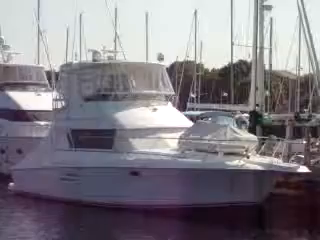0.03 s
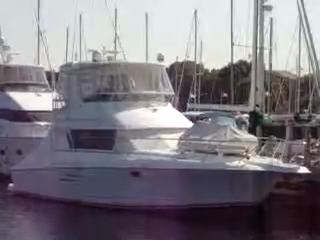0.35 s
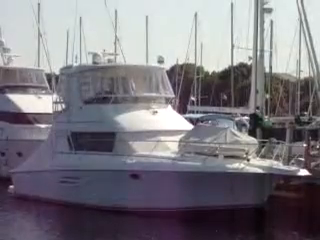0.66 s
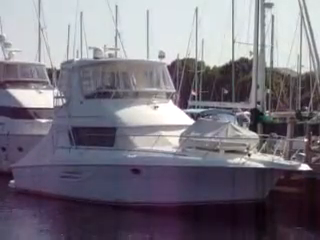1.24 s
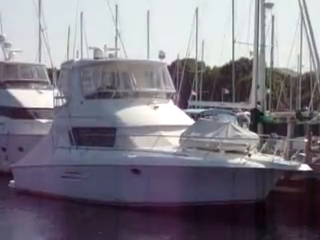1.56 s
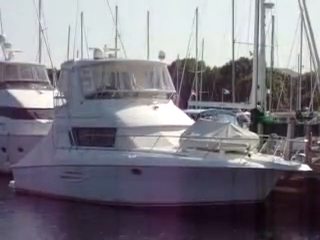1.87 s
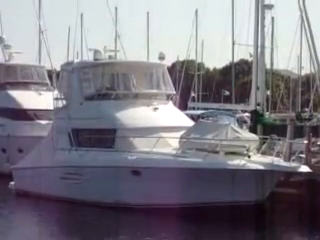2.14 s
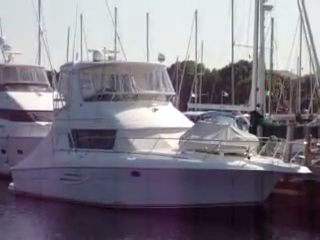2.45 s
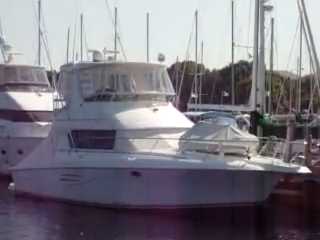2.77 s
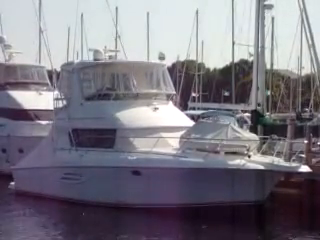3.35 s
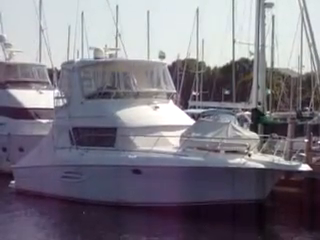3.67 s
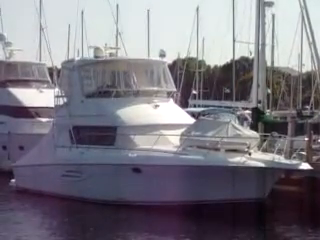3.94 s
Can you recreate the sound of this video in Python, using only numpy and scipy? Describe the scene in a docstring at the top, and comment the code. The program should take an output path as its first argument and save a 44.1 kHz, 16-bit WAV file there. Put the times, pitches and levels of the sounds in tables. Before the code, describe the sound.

Wind and distant engines rumble steadily at a marina, with a hum and a thin high electronic whine. Early on, a few sharp knocks, snaps and a metal clink sound close to the microphone, then only faint taps and chirps.

```python
"""A marina, on one camera microphone. The camera fades in on a steady low rumble of wind and distant
engines with one hum in it, and adds its own hiss and a thin whine that ticks once a picture.
Faint taps start around the moorings. Close by, a hard body knocks and snaps and a small metal fitting
clinks, all in the first second or so. Wind puffs on the microphone now and then, the taps go on,
and from three seconds in a far bird chirps twice."""
import sys
import numpy as np
from scipy.fft import rfft, irfft, next_fast_len
from scipy.io import wavfile
from scipy.ndimage import map_coordinates

SR = 44100
rng = np.random.default_rng(int(sys.argv[2]) if len(sys.argv) > 2 else 0)


def output_pcm(signal):
    """Save a mono or channel-first signal as 16-bit PCM at the path in sys.argv[1].

    Samples are clipped to [-1, 1] before scaling.
    """
    pcm = np.clip(np.atleast_2d(signal).T, -1, 1) * 32767
    wavfile.write(sys.argv[1], SR, np.round(pcm).astype(np.int16))


N = 176400
T = np.arange(N) / SR
RING_T = np.arange(SR // 4) / SR  # seconds since a contact


def amp(db):
    """Decibels to gain."""
    return 10 ** (np.asarray(db) / 20)


def unit(x):
    """Scale to rms 1."""
    return x / np.sqrt(np.mean(x ** 2) + 1e-20)


def curve(rows):
    """(time, value) points joined by lines."""
    return np.interp(T, *np.transpose(rows))


def wobble(rate):
    """A smooth random curve, rate knots a second."""
    return map_coordinates(rng.standard_normal(8192), [T * rate], mode="wrap")


def tone(pitch_hz):
    """A sine that follows a moving pitch."""
    return np.sin(2 * np.pi * np.cumsum(pitch_hz) / SR)


def filtered(x, response):
    """Filter x by a gain given as a function of frequency."""
    size = next_fast_len(N + 8192)
    return irfft(rfft(x, size) * response(np.fft.rfftfreq(size, 1 / SR)), size)[:N]


def noise(spectrum):
    """Noise of rms 1 shaped by (f/Hz, level/dB) points."""
    hz, db = np.transpose(spectrum)

    def response(f):
        return amp(np.interp(np.log(f + 1), np.log(hz), db, left=-120, right=-120))
    return unit(filtered(rng.standard_normal(N), response))


def band(hz, octaves):
    """Noise of rms 1 around one frequency."""
    white = rng.standard_normal(N)
    return unit(filtered(white, lambda f: np.exp(-(np.log2((f + 1) / hz) / octaves) ** 2)))


def add(track, s, sound):
    """Mix a sound in at s seconds."""
    part = track[round(s * SR):][:len(sound)]
    part += sound[:len(part)]


def ring(modes, scatter_db=1):
    """Damped modes of alternating sign, a little different at each blow."""
    out = np.zeros(len(RING_T))
    for k, (hz, db, t60) in enumerate(modes):
        decay = amp(db + scatter_db * rng.standard_normal() - 60 * RING_T / t60)
        out += (-1) ** k * decay * np.sin(2 * np.pi * hz * RING_T)
    return out


def blows(contacts, modes, crack_db, crack_t60_s):
    """Each contact gives a short crack and rings the modes."""
    out = np.zeros(N)
    for s, db in contacts:
        crack = amp(crack_db - 60 * RING_T / crack_t60_s) * rng.standard_normal(len(RING_T))
        add(out, s, amp(db) * (ring(modes) + crack))
    return out


def wind_and_engines(lumps_db=1.3, wash_db=-33, flutter_db=0.98):
    """Wind and engines across the marina: a lumpy low rumble under a smoother distant wash."""
    # swells of the rumble: t/s, level/dB
    rumble_level = [(0.3, -22), (0.5, -28), (0.63, -19), (0.8, -24.5), (1.08, -21), (1.3, -25), (1.56, -22),
                    (1.7, -23.5), (2.3, -23), (2.5, -24), (2.95, -22.5), (3.5, -24.5), (3.75, -22),
                    (4.0, -23.5)]
    # spectra of the rumble and the wash: f/Hz, relative density/dB
    rumble_spectrum = [(15, -31), (30, -10), (50, -4), (75, -0.5), (130, 2), (185, -.5), (260, -2.5),
                       (350, -7), (500, -12.5), (750, -17.5), (1200, -28), (2500, -70)]
    wash_spectrum = [(150, -6.5), (400, -2), (650, -3), (880, 1.5), (1050, -8.5), (1300, -14.5),
                     (1650, -16), (2000, -19), (2400, -25.5), (3200, -25), (4000, -36.5), (6000, -44)]
    rumble = unit(noise(rumble_spectrum) * amp(lumps_db * wobble(21.94)))
    wash = noise(wash_spectrum) * amp(wash_db + flutter_db * wobble(14))
    return rumble * amp(curve(rumble_level)) + wash


def engine_hum(hz=185.1, wander_hz=0.77, waver_db=1):
    """One wavering tone from a distant engine."""
    # course of the hum: t/s, level/dB
    hum_level = [(0.3, -27.5), (0.9, -29.5), (1.4, -31.5), (2.0, -29.5), (2.5, -26.5), (2.9, -24.5),
                 (3.4, -25.5), (4.0, -27)]
    hum = np.sqrt(2) * tone(hz + wander_hz * wobble(9))
    return hum * amp(curve(hum_level) + waver_db * wobble(10))


def camera_whine(picture_hz=28.94, first_tick_s=0.0075, tick_s=0.0017, swing_hz=4, jitter_hz=7):
    """The camera's electronics: two thin whines; each picture ticks and tugs the main whine's pitch."""
    # drift of the main whine: t/s, f/Hz
    drift = [(0, 7702), (1.36, 7703), (1.38, 7694), (2.3, 7696), (3.0, 7702), (4.0, 7697)]
    # spectrum of a tick: f/Hz, relative density/dB
    tick_spectrum = [(2500, -23), (5000, -10), (5800, 5), (7500, -7), (8300, -15), (11000, -31)]
    pictures = (T - first_tick_s) * picture_hz
    pitch = curve(drift) + swing_hz * np.cos(2 * np.pi * pictures) + jitter_hz * wobble(250)
    main_whine = amp(-39.5) * tone(pitch)
    upper_whine = amp(-51) * np.sin(2 * np.pi * 7864 * T)
    since_tick = (pictures % 1) / picture_hz
    ticks = amp(-48 + 2 * wobble(4.2)) * noise(tick_spectrum) * np.exp(-since_tick / tick_s)
    return np.sqrt(2) * (main_whine + upper_whine) + ticks


def mooring_taps(t60_s=0.026):
    """Faint dry taps around the moorings, each a dying burst of noise with its own colour."""
    # taps: t/s, level/dB, centre f/Hz
    taps = [(0.2602, -35, 2190), (0.457, -38, 1900), (0.461, -41, 4400), (0.7577, -39, 3250),
            (0.9303, -34.5, 2970), (1.4864, -39, 2800), (2.7162, -41, 2600), (3.02, -42, 2360),
            (3.8177, -42, 3280), (3.8581, -39, 2100)]
    return sum(band(hz, octaves=0.52) * (T >= s) * amp(db - 60 * np.abs(T - s) / t60_s)
               for s, db, hz in taps)


def knocks():
    """Dull knocks on a hard body close to the microphone."""
    # contacts: t/s, level/dB
    contacts = [(0.3537, -14), (0.3736, -33), (0.5722, -29.5), (0.6385, -28.5), (0.6440, -30),
                (1.1400, -25), (1.1452, -24)]
    # modes of the body: f/Hz, level/dB, t60/s
    body_modes = [(600, -12, 0.024), (970, 3.5, 0.015), (1340, 2.5, 0.0079), (1627, -1, 0.024),
                  (2040, -4, 0.034), (2420, -6.5, 0.024), (2930, -4.5, 0.0097), (3140, -8, 0.019),
                  (3900, -2, 0.012), (4730, -11.5, 0.017), (6100, -3.5, 0.0042), (7000, -17, .006)]
    return blows(contacts, body_modes, crack_db=-17.5, crack_t60_s=0.006)


def snaps():
    """Sharp snaps, just as close, ring the higher modes of the body's shell."""
    # contacts: t/s, level/dB
    contacts = [(0.5722, -34), (0.6002, -26), (1.1384, -19), (1.1399, -10), (1.1426, -15.5)]
    # modes of the shell: f/Hz, level/dB, t60/s
    shell_modes = [(1880, -19.5, 0.028), (2500, -11, 0.027), (3050, -2.5, 0.015), (3360, -7.5, 0.011),
                   (4300, -6.5, 0.0087), (4970, -1.5, 0.0087), (5760, -11, .012), (6300, -9.5, .01),
                   (7460, -7.5, 0.009), (8330, -11.5, 0.0093)]
    return blows(contacts, shell_modes, crack_db=-18.5, crack_t60_s=0.008)


def clinks(flat_fraction=0.12, settle_s=0.001):
    """Each touch of a small metal fitting nearby gives a short ping and a longer ring."""
    # touches: t/s, ring level/dB, ping f/Hz, ping level/dB, ping t60/s
    touches = [(0.5725, -38, 6170, -20.5, .013), (0.6004, -26, 3460, -22, 0.032),
               (0.6012, -44, 7000, -24, .028), (0.6368, -35, 4544, -21.5, 0.037)]
    # modes of the fitting: f/Hz, level/dB, t60/s
    fitting_modes = [(1440, -8.5, .09), (1770, -7, .025), (2020, 1.5, 0.14), (2320, -4.5, 0.2),
                     (4650, -6, .012), (5750, 2, 0.014), (8250, -9, .016), (9100, -12, 0.015)]
    out = np.zeros(N)
    for s, ring_db, hz, ping_db, t60 in touches:
        pitch = hz * (1 - flat_fraction * np.exp(-RING_T / settle_s))  # starts flat and settles
        ping = amp(ping_db - 60 * RING_T / t60) * tone(pitch)
        add(out, s, ping + amp(ring_db) * ring(fitting_modes))
    return out


def wind_puffs():
    """Brief low swells of wind right on the microphone."""
    # puffs: t/s, level/dB, centre f/Hz, half-length/s
    puffs = [(0.585, -20.5, 121, 0.013), (0.891, -17.5, 167, .012), (1.025, -26, 335, 0.013),
             (1.39, -18.5, 76, 0.022), (1.564, -20, 222, .02), (2.623, -17, 150, 0.013),
             (3.742, -28.5, 424, .04)]
    return sum(amp(db) * band(hz, octaves=0.81) * np.exp(-((T - s) / half_s) ** 2)
               for s, db, hz, half_s in puffs)


def bird_chirps(upturn_hz=200, blur_hz=85.5):
    """Faint, fuzzy notes of a far bird, each turning up at the end."""
    # notes: t/s, length/s, f/Hz, level/dB
    notes = [(3.027, 0.3, 3460, -51), (3.558, 0.13, 3720, -56)]
    out = np.zeros(N)
    for s, length, hz, db in notes:
        progress = np.clip((T - s) / length, 0, 1)
        pitch = hz + upturn_hz * progress ** 6 + blur_hz * wobble(500)
        arch = np.sqrt(np.abs(np.sin(np.pi * progress)))
        out += amp(db) * arch * tone(pitch)
    return out


def scene():
    """The marina, near and far, at a single microphone, with the camera's own whine."""
    steady = wind_and_engines() + engine_hum() + camera_whine()
    events = mooring_taps() + knocks() + snaps() + clinks() + wind_puffs() + bird_chirps()
    return (steady + events)[None]


def record(dry):
    """The camera unmutes, fades in over its own steady hiss and rolls off at its band limit."""
    # spectrum of the camera's hiss: f/Hz, relative density/dB
    hiss_spectrum = [(1000, -6), (4500, 1), (5300, -1), (5750, 3), (6200, -0.5), (7100, 3), (7600, 3.5),
                     (8200, 0.5), (9000, -2), (10400, -1.5), (12500, 5)]
    start_s, start_db, fade_s = 0.073, -11.5, 0.32
    roll_off_hz, top_hz = 10830, 12170
    fade = amp(start_db * np.clip(1 - (T - start_s) / fade_s, 0, 1))
    unmute = np.clip((T - start_s) / 0.0014, 0, 1)
    sound = unmute * (dry[0] * fade + amp(-53) * noise(hiss_spectrum))
    return filtered(sound, lambda hz: (hz < top_hz) / (1 + (hz / roll_off_hz) ** 29))[None]


dry = scene()
out = record(dry)
output_pcm(out)
```